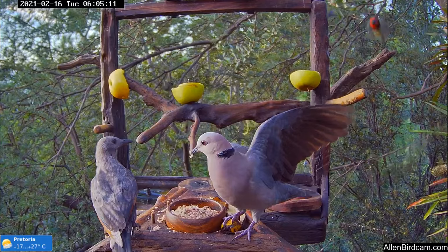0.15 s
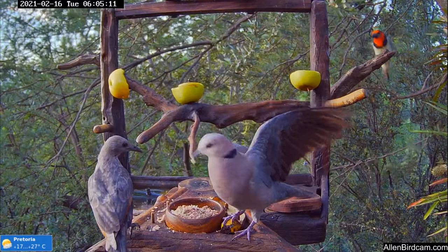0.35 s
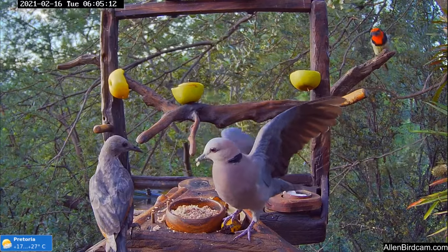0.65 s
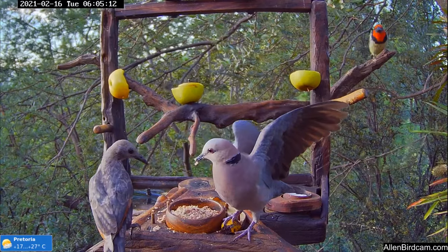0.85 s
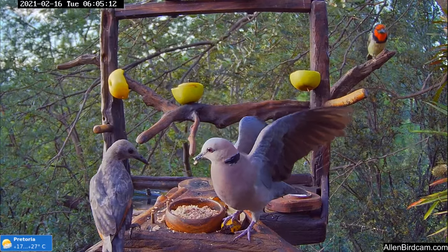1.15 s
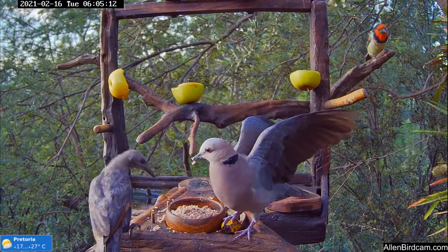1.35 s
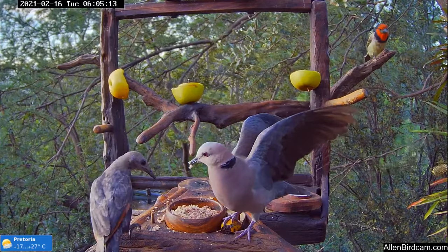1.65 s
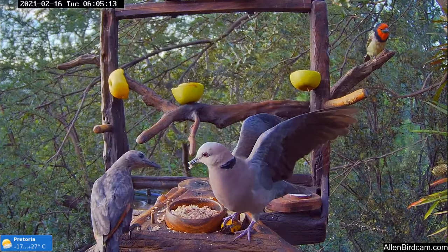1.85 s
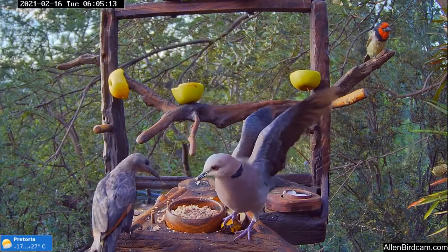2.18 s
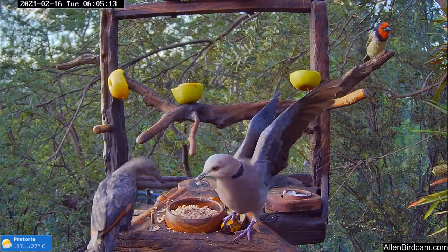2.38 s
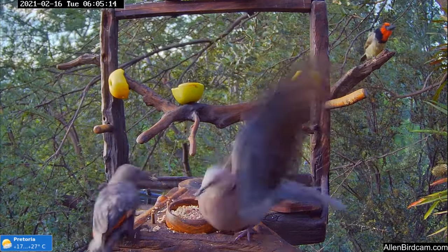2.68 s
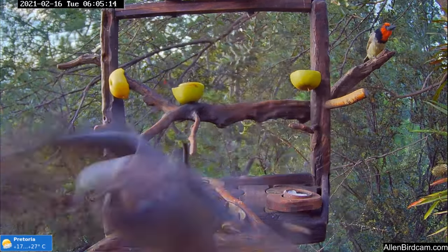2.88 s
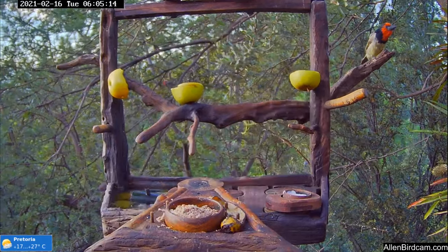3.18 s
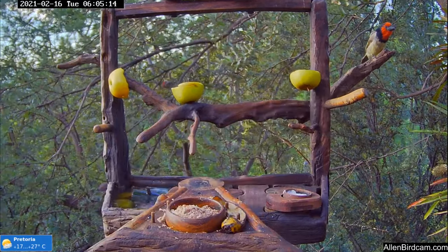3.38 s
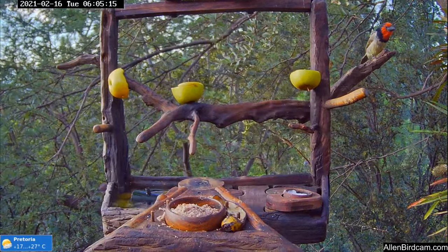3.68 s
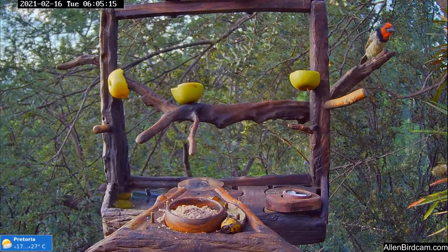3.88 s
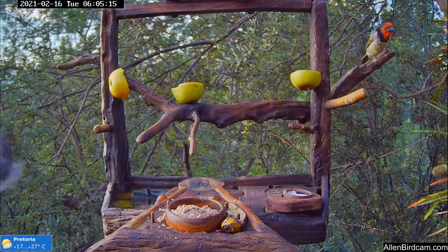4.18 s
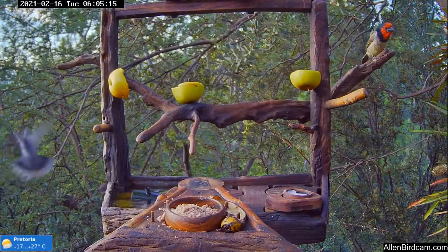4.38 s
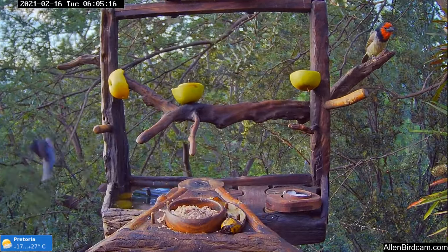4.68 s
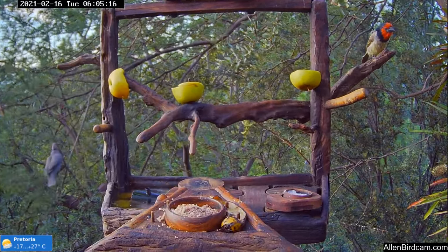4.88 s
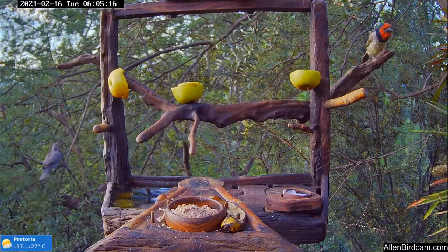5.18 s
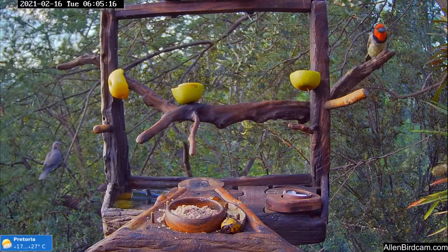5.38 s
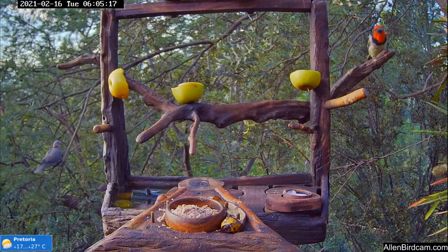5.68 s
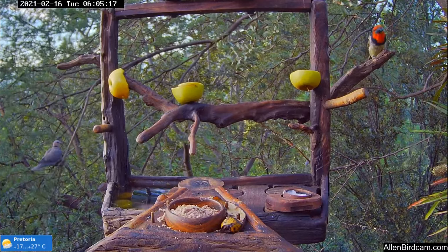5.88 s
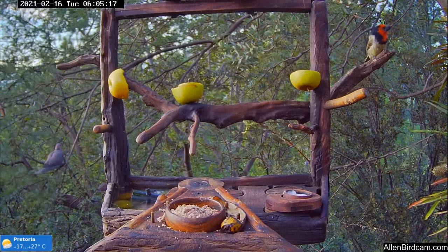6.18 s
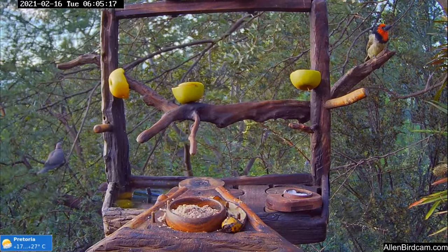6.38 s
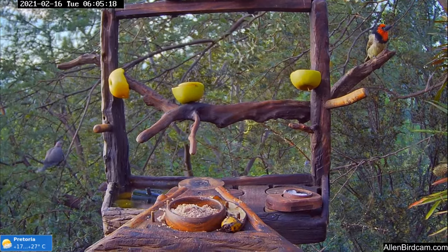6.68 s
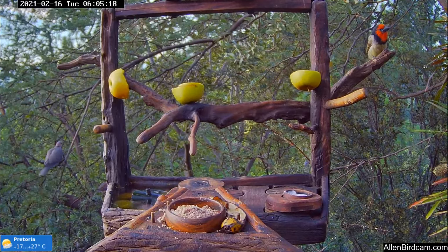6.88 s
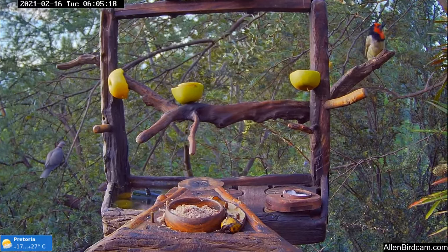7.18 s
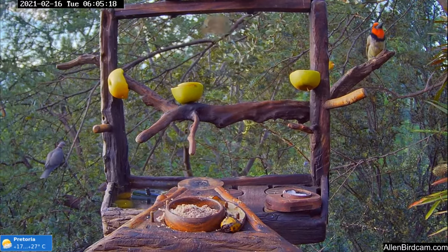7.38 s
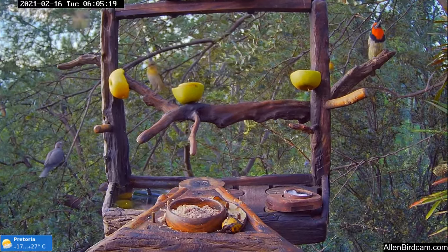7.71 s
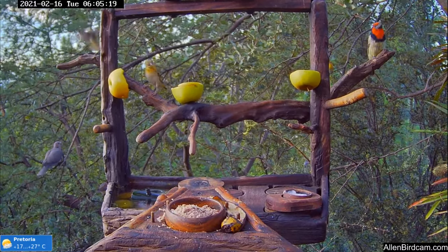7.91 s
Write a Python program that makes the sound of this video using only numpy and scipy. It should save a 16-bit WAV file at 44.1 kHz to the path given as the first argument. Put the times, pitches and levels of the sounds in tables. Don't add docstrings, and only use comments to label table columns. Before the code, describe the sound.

Early morning garden feeder, heard close up. Soft traffic drone and wind rumble come first, then one buzzy chirp and a sudden crack of dove wings, with airy strokes, breathy feather whistles and deep wind puffs fading quickly. Calm returns with faint distant hoots and a weaker chirp. Later, beak ticks and scraping claws on bark lead to a brief series of harsh clicking rasps over buffeting wind.

```python
import sys
import numpy as np
from scipy import signal
from scipy.fft import rfft, irfft, next_fast_len
from scipy.io import wavfile
from scipy.ndimage import uniform_filter1d, map_coordinates

SR = 44100
rng = np.random.default_rng(int(sys.argv[2]) if len(sys.argv) > 2 else 0)


def generate_wav(signal):
    frames = np.transpose(np.atleast_2d(signal))
    scaled = np.clip(frames, -1, 1) * 32767
    pcm = np.round(scaled).astype(np.int16)
    wavfile.write(sys.argv[1], SR, pcm)


def elevation(decibels):
    levels = np.asarray(decibels, float)
    return 10 ** (levels / 20)


N = 355005
TIME = np.arange(N) / SR

# time_s, peak_db, thud_db, treble_db and rustle_db (both against the peak)
CLAPS = [(2.1384, -41.5, -23, -3, -31), (2.1438, -10.5, -15.5, -4, -27.5), (2.1484, -13.5, -20.5, -3, -37),
         (2.1594, -20, -22, 0.5, -37.5), (2.1624, -36, -32.5, -10, -28.5), (2.2194, -19.5, -27.5, -17, -27),
         (2.1924, -49, -55, -6, -21), (2.2444, -60, -49, -27, -9), (2.355, -52, -50, -9, -5),
         (2.365, -40, -55, -1.5, -16), (2.4099, -41.5, -41, -30, -6), (2.4813, -43, -56, -33, -22),
         (2.5094, -48, -37, -19, -24), (2.5453, -62, -54, -24, -25.5), (2.597, -47, -37, -22, -10),
         (2.7194, -73, -54, -17, -9), (2.8434, -52, -49, -5, -5), (2.9407, -58, -54, -17, -16),
         (2.975, -64, -56, -4.5, -12), (3.537, -60, -52, -10, -14.5)]
# pitch_hz, level_db
FEATHERS = [(900, -31.5), (1600, -0.5), (2600, 1.5), (4200, 5.5), (6500, 5), (8000, -7), (11000, -21)]
# pitch_hz, level_db
QUILLS = [(5500, -32.5), (7200, 3), (10000, -6), (13000, -16.5), (15800, -14.5)]
# time_s, peak_db, pitch_hz
WHISTLES = [(2.398, -34, 860), (2.414, -36, 840), (2.632, -40, 800), (2.642, -43, 770), (2.422, -29.5, 827),
            (2.502, -32, 882), (2.65, -35, 655), (2.769, -35, 890), (2.894, -42.5, 795), (3.016, -43, 890),
            (3.148, -45.5, 860), (3.249, -47, 795), (3.456, -43.5, 906), (2.2657, -45, 1310),
            (2.2844, -54, 1120)]
# time_s, peak_db
DOWNWASH = [
    (2.262, -17),
    (2.394, -16),
    (2.509, -13),
    (2.613, -23),
]
# start_s, top_pitch_hz, whistle_db, buzz_db, stretch (length against the glide)
CHIRPS = [
    (1.829, 5535, -27.5, -26.5, 1.02),
    (4.845, 5437, -32.5, -30.5, .9),
]
# after_start_s, share_of_top_pitch
GLIDE = [(0, .94), (.006, 1.0), (.015, 0.94), (.025, .815), (.033, .76), (0.042, .67), (.046, .46),
         (.077, .395), (.084, .385)]
# after_start_s, level_db
LEVEL_WAVER = [
    [(.006, 1), (.018, 3), (.024, -7.5), (.0315, 6), (.036, -8), (.039, 0), (.044, -4), (.047, 3)],
    [(.009, -8), (.018, 2), (.0198, -6), (.026, 2), (.0305, -4), (.0345, -2), (.0365, 6), (.039, 2),
     (.043, 1)],
]
# whistle_db, buzz_db
OVERTONE_FALL_DB = [(16, 12), (23, 15)]
# pitch_hz, level_db
BEAK = [(1800, -33), (2400, -18.5), (3000, -13.5), (3700, -2.5), (4400, -1), (5600, -1.5), (6600, -7),
        (7800, -7), (10000, -10), (11600, -27.5), (13000, -23.5), (15300, -3.5)]
# delay_s, level_db
BRANCHES = [(.0021, -12.5), (.009, -14), (0.016, -14.5)]
# start_s, held_s, first_db, last_db, mouth_hz
RASPS = [
    (6.537, 0.017, -35.5, -35.5, 5180),
    (6.675, 0.21, -29.5, -28.5, 5670),
    (6.976, 0.021, -30, -37, 5530),
    (7.060, .013, -32, -34, 5240),
    (7.136, 0.024, -26, -35, 5340),
]
# pitch_hz, level_db, dies_by_60_db_s
THROAT = [(773, -21, 0.017), (1536, -18, 0.0067), (2080, -5, 0.002), (2810, -13.5, 0.0069),
          (4650, -11, 0.00366), (6920, -5, 0.0031)]
# upper_ring_hz, upper_db, top_ring_hz, top_db
TREBLE = [(9370, -11, 15000, -21.5), (9940, -5, 13300, -16.5), (9500, -6.5, 12500, -20),
          (9600, -6.5, 9800, -20), (10300, -3.5, 11500, -13)]
DEPTHS = [(.25, 0.93, 0.59), (0.17, .3, 0.84), (.35, .1, 0.3), (.3, 0.205, .3), (.15, 0.2, .6)]
# from_hz, to_hz
VALLEYS = [(3450, 4150), (7900, 8600)]
# pitch_hz, level_db
WIDE_RINGS = [(11300, -9), (14870, -18), (8400, -5.5)]
# time_s, level_db
STRAYS = [(6.534, -60.5), (6.572, -46), (6.578, -51), (6.584, -45), (6.592, -45), (6.599, -48),
          (6.928, -47), (7.057, -58), (7.12, -51), (7.126, -48.5), (7.176, -38), (7.184, -44), (7.191, -42)]
# start_s, peak_db, strongest_ring_hz, length_s, swell (0-1)
CLAWS = [(0.453, -55, 2000, .016, 0.4), (4.829, -52.5, 5280, .016, 0), (5.912, -46.5, 1800, 0.034, 0.93),
         (6.028, -43.5, 4330, 0.024, 0.99), (6.047, -41, 2970, 0.027, 0.91),
         (6.175, -37, 2030, 0.047, 0.94), (6.195, -31.5, 5700, 0.027, 0.9), (6.211, -31.5, 4500, .02, 0.86),
         (6.225, -38, 3000, 0.031, 0.93), (6.248, -32, 2660, 0.014, 0.95), (6.253, -35, 5030, 0.016, .8),
         (6.256, -37.5, 2660, .012, 1)]
SPOTS = [(1750, 2400, 2800, 2700), (3500, 4000, 7500, 6200), (2800, 7100, 10400, 5200),
         (6860, 4600, 5100, 4400), (2870, 2400, 3540, 3900), (2900, 2070, 1650, 4300),
         (5870, 4000, 7110, 12600), (4900, 6100, 2740, 10400), (2680, 4300, 1400, 6700),
         (2860, 2600, 5600, 2580), (5280, 3870, 6340, 5100), (2620, 7900, 8600, 5320)]
# pitch_hz, level_db
BARK = [(1500, -0.5), (7000, 0.5), (8500, -5), (11000, -8.5), (13500, -19)]
# time_s, peak_db, then three columns of ring_hz
TAPS = [(2.481, -37, 3100, 4460, 6300), (2.597, -35, 2680, 5430, 4700), (2.843, -52, 8900, 6950, 4670),
        (2.989, -49, 2660, 4750, 3400), (5.739, -44.5, 7200, 5670, 7700), (5.747, -45, 7200, 5600, 6100),
        (5.761, -40, 4920, 2750, 11000), (5.877, -29, 7130, 5300, 10040), (5.878, -41, 3740, 2700, 8900),
        (6.011, -42, 7620, 3600, 5110), (5.762, -43, 8700, 6500, 7600), (5.891, -35.5, 1760, 3860, 10500),
        (6.010, -38, 9000, 4470, 10500), (6.136, -40, 5900, 7000, 10500), (6.376, -58.5, 5000, 6000, 8100),
        (6.4867, -52, 5400, 9100, 4600), (6.492, -38, 4440, 5550, 4740)]
# time_s, peak_db, pitch_hz
KNOCKS = [(2.504, -28, 281), (6.729, -27.5, 487), (6.845, -30.5, 752), (7.0, -32.5, 705),
          (0.741, -43.5, 528), (2.932, -40.5, 557), (4.569, -41.5, 560), (4.828, -39, 620)]
# time_s, strength_db
WIND = [(0.0, -52), (0.25, -33.5), (0.55, -35.5), (0.75, -46.5), (1.3, -43), (1.85, -47), (2.12, -34.5),
        (2.3, -23.5), (2.9, -29), (3.35, -33.5), (4.3, -32), (4.65, -26.5), (5.1, -35), (5.8, -32),
        (6.45, -29.5), (6.95, -21), (7.5, -26), (8.05, -36.5)]
# pitch_hz, level_db
PUSH = [(3, -40), (6, 12), (19, 7.5), (30, -5), (45, -26.5), (80, -72.5)]
# pitch_hz, level_db
FLUTTER = [(22, -24.5), (36, 6.5), (70, -1.5), (110, -11.5), (170, -19), (300, -66)]
# time_s, push_rise_db, flutter_rise_db
GUSTS = [(0.02, -23, 14.5), (1.0, 10, 4), (1.5, 13.5, 9.5), (3.15, 5, -6), (3.599, 7, -0.5), (3.82, 7, -3),
         (4.05, 11, 3), (5.3, 5, -1), (5.55, -1, 3.5), (5.93, 7.5, 1.5), (6.6, -4.5, -6), (7.2, 1, 0),
         (7.33, 5, -5.5), (7.7, 6, -6.5)]
# time_s, roar_db
ROAD = [(0.0, -53), (0.33, -55.5), (0.55, -54), (1.05, -53.5), (1.3, -56.5), (2.1, -53.5), (2.35, -44.5),
        (2.65, -49), (3.0, -53.5), (3.9, -55), (4.3, -52), (5.5, -53), (6.1, -58.5), (6.7, -55.5),
        (7.05, -47), (7.35, -55), (8.05, -56.5)]
# pitch_hz, level_db
DRONE = [(110, -24.5), (150, 0.5), (195, 1), (228, 1.5), (262, 6), (305, 8), (370, -2.5), (450, -50)]
# pitch_hz, level_db
ROAR = [(210, 3), (350, -5), (425, -2.5), (502, -3), (555, 1), (714, -2.5), (896, -7), (1230, -14),
        (1480, -16.5), (2070, -28.5), (2600, -44.5), (3380, -61), (5720, -120)]
# time_s, rise_db
LORRIES = [(0.05, 12.5), (.47, 11.5), (0.92, 13.5), (1.68, 11.5), (2.55, 8), (2.98, 10), (4.12, 1.5),
           (6.76, 12), (7.42, 9.5), (7.95, 6)]
# time_s, level_db
ENGINE = [(0, -67), (1, -56.5), (1.5, -50), (2, -52), (3.1, -47.5), (3.5, -56.5), (8.05, -66)]
# time_s, rise_db
LOAD = [
    (1.72, 22),
]
# pitch_hz, level_db
HISS = [(1200, -26), (2000, -5), (3000, -2), (5000, -8), (8000, -14), (11000, -20.5), (15500, -20.5),
        (16200, -57.5)]
# start_s, length_s, first_hz, last_hz, level_db
FAR = [(4.103, 0.12, 232, 223, -45), (4.876, 0.057, 246, 224, -41), (5.212, 0.16, 250, 224, -49),
       (5.463, 0.14, 228, 242, -48), (2.838, 0.13, 220, 230, -47), (0.39, 0.024, 5640, 5600, -57),
       (.42, 0.1, 5600, 5600, -82), (0.625, 0.085, 1470, 1640, -56), (0.75, 0.12, 1480, 1590, -56),
       (.94, .04, 1480, 1440, -66), (.85, .06, 5750, 5900, -85), (1.815, .028, 2900, 2800, -68),
       (0.76, 0.11, 3060, 2890, -77), (2.905, 0.055, 3100, 3050, -75), (2.545, .05, 5000, 4950, -73),
       (3.97, .13, 2900, 2850, -82), (3.296, 0.13, 3500, 3730, -82), (5.27, 0.094, 3650, 3550, -79),
       (5.295, 0.068, 3060, 3100, -78), (7.431, 0.035, 4100, 4120, -79), (7.45, 0.05, 3480, 3600, -71),
       (7.472, .025, 3150, 3050, -72), (7.497, 0.12, 3120, 3130, -71), (7.5, .11, 3680, 3680, -75)]
# time_s, peak_db
CRACKLE = [(0.6365, -75), (1.2905, -73), (1.4491, -70), (1.4965, -73), (1.5359, -73), (1.6561, -73),
           (1.696, -71), (3.5367, -73.5), (4.1713, -69), (4.295, -72), (4.3349, -69), (4.3943, -78),
           (4.4142, -78), (4.4551, -69), (4.495, -72.5), (4.5155, -79), (4.5345, -77.5), (4.5744, -75),
           (4.6542, -71), (4.6946, -74), (4.7739, -74), (4.8148, -77), (5.0742, -76), (5.3939, -75),
           (5.4937, -73), (5.5536, -70), (5.7137, -74.5), (7.4521, -78), (7.4711, -75.5), (7.5938, -74.5),
           (7.6746, -74), (7.8617, -68), (7.914, -71), (7.954, -73)]
# pitch_hz, dies_by_60_db_s
GARDEN = [(200, 0.37), (2000, 0.31), (4300, 0.24), (6500, 0.25), (10000, 0.18), (13000, 0.15)]


def unit(x):
    return x / np.sqrt(np.mean(x ** 2) + 1e-20)


def along(points, hz):
    f, v = np.transpose(points)
    return np.interp(np.log(hz + 1), np.log(f + 1), v)


def curves(rows):
    s, *cols = np.transpose(rows)
    return [np.interp(TIME, s, c) for c in cols]


def during(rows):
    return (TIME > rows[0][0]) & (TIME < rows[-1][0])


def near(s, length):
    return slice(max(int(s * SR), 0), int((s + length) * SR) + 1)


def bumps(s, rise_db, half_s):
    steps = TIME[::100]
    bells = np.exp(-.5 * ((steps[:, None] - s) / half_s) ** 2)
    return np.interp(TIME, steps, bells @ rise_db)


def wobble(rate):
    steps = TIME[::8]
    knots = rng.standard_normal(int(N * rate / SR) + 4)
    return np.interp(TIME, steps, map_coordinates(knots, [steps * rate]))


def below(x, top_hz, edge_hz):
    m = next_fast_len(N)
    gain = .5 - .5 * np.tanh((np.fft.rfftfreq(m, 1 / SR) - top_hz) / edge_hz)
    return irfft(rfft(x, m) * gain, m)[..., :N]


def rush(spectrum, patchy_db):
    z = signal.stft(rng.standard_normal(N), nperseg=1024)[2]
    field = uniform_filter1d(rng.standard_normal(z.shape), size=4, axis=0)
    field = uniform_filter1d(field, size=8, axis=1)
    x = signal.istft(z * elevation(patchy_db * unit(field)), nperseg=1024)[1][:N]
    m = next_fast_len(N + 8192)
    closed = [(spectrum[0][0] / 2, -120), *spectrum, (spectrum[-1][0] * 2, -120)]
    colour = elevation(along(closed, np.fft.rfftfreq(m, 1 / SR)))
    return unit(irfft(rfft(x, m) * colour, m)[:N])


def rings(s, hz, size, t60, rise):
    s, hz, size, t60 = (np.ravel(v)[:, None] for v in np.broadcast_arrays(s, hz, size, t60))
    at = np.ceil(s * SR).astype(int) + np.arange(int(t60.max() * SR))
    t = at / SR - s
    wave = size * np.sin(2 * np.pi * hz * t) * elevation(-60 * t / t60) * (1 - np.exp(-t / rise))
    return np.bincount(at.ravel(), wave.ravel(), N + SR)[:N]


def wing_swish(slap, snap):
    from_s, lift_s = 2.12, .17
    stroke_s, stroke_at_s = .121, 2.385
    since = TIME - from_s - lift_s
    swish_db = -53.5 + np.where(since < 0, 35 * since, -33 * since)
    treble_db = -17 - 31.5 * np.abs(since)
    beat_db = 3.5 * np.cos(2 * np.pi * (TIME - stroke_at_s) / stroke_s)
    fade_in = np.clip((TIME - from_s) / 0.028, 0, 1) ** 2
    level = fade_in * elevation(beat_db + swish_db - 5.0 + 3 * wobble(70) + 3 * wobble(320))
    swish = level * (slap + elevation(treble_db) * snap)
    draw_s, draw_db, draw_db_per_s = 1.9, -46.5, 900.5
    draw = (TIME < draw_s) * elevation(draw_db + draw_db_per_s * np.minimum(TIME - draw_s, 0))
    return swish + draw * (slap + .6 * snap)


def wing_claps(slap, snap):
    out = np.zeros(N)
    thud = rush([(60, -30), (150, 2), (450, -5), (1000, -3), (1500, -8), (3000, -40)], patchy_db=.5)
    rustle = elevation(3.5 * wobble(220)) * (rush(FEATHERS, patchy_db=5) + .2 * snap)
    for s, db, thud_db, bright_db, rustle_db in CLAPS:
        part = near(s, .25)
        t = np.maximum(TIME[part] - s, 0)
        burst = elevation(-5 - 60 * t / .013) * (1 - np.exp(-t / .0004))
        out[part] += elevation(db) * burst * (slap[part] + elevation(bright_db) * snap[part])
        out[part] += elevation(db + rustle_db - 60 * t / 0.072) * (1 - np.exp(-t / 0.0019)) * rustle[part]
        out[part] += elevation(thud_db + 1.5 - 60 * t / .022) * (1 - np.exp(-t / .0008)) * thud[part]
    s, db, _, bright_db, _ = np.transpose(CLAPS)[..., None]
    crack_db = db + [-11, -3, 3] + bright_db * [0, 0, 1]
    return out + rings(s + .001, [1050, 3900, 6900], elevation(crack_db), .004, rise=.00006)


def wing_whistles():
    out = np.zeros(N)
    for s, db, hz in WHISTLES:
        part = near(s - .04, .08)
        t = TIME[part] - s - .004
        width = np.where(t < 0, .005, .003)
        out[part] += elevation(db) * np.exp(-.5 * (t / width) ** 2) * np.sin(2 * np.pi * hz * t)
    return out


def doves():
    slap, snap = rush(FEATHERS, patchy_db=2.5), rush(QUILLS, patchy_db=2.5)
    return wing_swish(slap, snap) + wing_claps(slap, snap) + wing_whistles()


def finch():
    out = np.zeros(N)
    plain, share = np.transpose(GLIDE)
    edge_db = -23.5
    sweeps_per_s, sweep_top, sweep_drop = 92, 1.06, .62
    second_voice_s, second_voice_db = .0048, -5.5
    for chirp, level_waver, (pure_db, harsh_db) in zip(CHIRPS, LEVEL_WAVER, OVERTONE_FALL_DB):
        s, top_hz, whistle_db, buzz_db, stretch = chirp
        after = np.append(stretch * plain[:-2], plain[-2:])
        break_s = after[-3]
        part = near(s, after[-1])
        t = TIME[part] - s
        levels = [whistle_db + edge_db, whistle_db, buzz_db, buzz_db - 4.5, buzz_db + edge_db]
        db = np.interp(t, after[[0, 1, -3, -2, -1]], levels)
        db = db + np.interp(t, *np.transpose(level_waver))
        buzz = 0.96 * np.clip((t - break_s) / 0.0022 + 1, 0, 1)
        stroke = (sweeps_per_s * np.maximum(t - break_s + .0031, 0) + .07 * wobble(110)[part] + .02) % 1
        sweep = (sweep_top - sweep_drop * stroke) * (1 + .1 * wobble(900)[part])
        pitch_hz = top_hz * np.where(buzz > .2, sweep, np.interp(t, after, share))
        turn = 2 * np.pi * np.cumsum(pitch_hz) / SR
        fall_db = pure_db + (harsh_db - pure_db) * buzz + 4.5 * wobble(220)[part]
        tone = 0
        for k in range(1, 7):
            size = elevation(along(BEAK, k * pitch_hz) - fall_db * (k - 1)) * (k * pitch_hz < SR / 2)
            tone = tone + size * np.sin(k * turn)
        soft = np.clip(t / 0.0046, 0, 1)
        gate = 1 - (t > break_s - .004) * np.cos(np.pi * stroke) ** 16
        voice = soft * elevation(db + 3 + (.8 + 2.2 * buzz) * wobble(300)[part]) * tone * gate
        out[part] += voice + elevation(second_voice_db) * np.roll(buzz * voice, round(second_voice_s * SR))
    out = out - 0.99 * (below(out, 13000, edge_hz=250) - below(out, 11700, edge_hz=290))
    return out + sum(elevation(db) * np.roll(out, round(delay * SR)) for delay, db in BRANCHES)


def rasp(s, held, first_db, last_db, mouth_hz):
    rise_s, fall_s, pulses_per_s = .010, .019, 420
    late_share, late_open = .7, .39
    first = np.array([first_db, pulses_per_s, mouth_hz])
    change = np.array([last_db - first_db, -130 * held, 4200 * held])
    end = s + rise_s + held
    return [(s, first_db - 15, pulses_per_s, mouth_hz),
            (s + rise_s, *first),
            (s + rise_s + late_share * held, *(first + change * [late_share, late_share, late_open])),
            (end, *(first + change)),
            (end + fall_s, *(first + change + [-12.5, -120, -110]))]


def barbet():
    out, wide = np.zeros(N), np.zeros(N)
    flutter, uneven = wobble(70), wobble(45)
    stray_s, stray_db = np.transpose(STRAYS)[..., None]
    throat_hz, throat_db, throat_t60 = np.transpose([(5300, 3, .004), *THROAT, (10500, -14, .003)])
    stray_size = elevation(stray_db + 7.5 + throat_db) * (-1) ** np.arange(len(throat_hz))
    out += rings(stray_s, throat_hz, stray_size, throat_t60, rise=.00002)
    depth = np.full((3, N), .3)
    for row, (upper_hz, upper_db, top_hz, top_db), shares in zip(RASPS, TREBLE, DEPTHS):
        rows = rasp(*row)
        start, lasts = rows[0][0], rows[-1][0] - rows[0][0]
        depth[:, near(start - .005, 1)] = np.clip(shares, 0, 1)[:, None]
        wide += during(rows) * np.clip((TIME - start - .055) / .035, 0, 1)
        db, rate, mouth_hz = curves(rows)
        throb = np.cos(2 * np.pi * 11.5 * (TIME - start - .042))
        db = db + 2.6 * lasts / .25 * throb + .6 * flutter
        rate = rate * (1 + .07 * uneven)
        at = np.flatnonzero(np.diff(np.floor(np.cumsum(rate * during(rows)) / SR)))
        chance = rng.standard_normal((len(at), 6))
        first = at / SR + .0001 * chance[:, 0]
        s = np.array([first, first + 0.001051 + 0.00022 * chance[:, 1]])
        twin_db = np.array([1.0 * chance[:, 2], -7 + 2.2 * chance[:, 3]])
        size = np.sign(rng.standard_normal(len(at)) - 1.1) * elevation(db[at] + 9.0 + twin_db)
        out += rings(s, mouth_hz[at] * (1 + .07 * chance[:, 4:].T), size, .0048, rise=.00002)
        opened = [(hz, ring_db + 30 * (wide[at] - 1), .0025) for hz, ring_db in WIDE_RINGS]
        bright = [(upper_hz, upper_db, .003), (top_hz, top_db, .003)]
        for hz, ring_db, t60 in [*THROAT, *bright, *opened]:
            tissue_hz = hz * (1 + .035 * rng.standard_normal(s.shape))
            ring_size = size * elevation(ring_db) * rng.choice([-1, 1], s.shape)
            out += rings(s, tissue_hz, ring_size, t60, rise=.00002)
    out = out - below(out, 460, edge_hz=140)
    for (from_hz, to_hz), share in zip(VALLEYS, depth):
        band = below(out, to_hz, edge_hz=210) - below(out, from_hz, edge_hz=250)
        out = out - share * (1.2 + 0.21 * np.tanh(2 * wobble(30))) * band
    narrow = depth[2] * below(out, 14300, edge_hz=740) + (1 - depth[2]) * below(out, 11400, edge_hz=500)
    wide = uniform_filter1d(wide, size=1200)
    return wide * out + (1 - wide) * narrow


def claws():
    s, db, ring_hz, length, swell = np.transpose(CLAWS)[..., None]
    chance = rng.random((len(CLAWS), 5, 240))
    sudden, swelling = chance[:, 0] ** 2.6, (chance[:, 0] + chance[:, 4]) / 2
    when = s + length * ((1 - swell) * sudden + swell * swelling)
    spread_hz = 1600 * 8.3 ** ((np.arange(5) + rng.random((len(CLAWS), 5))) / 5)
    pitches_hz = np.hstack([ring_hz, ring_hz, ring_hz, SPOTS, SPOTS, spread_hz])
    pick = (chance[:, 3] * pitches_hz.shape[1]).astype(int)
    loose = np.where(pick > 10, .2, .03)
    hz = np.take_along_axis(pitches_hz, pick, axis=1) * (1 + loose * (chance[:, 2] - .5))
    fade_db = 6.3 * (0.5 - swell) * chance[:, 0]
    size = elevation(db - 14.5 - 17.6 * chance[:, 1] - fade_db + along(BARK, hz))
    early = chance[:, 4] > .88
    when = when - early * .008 * chance[:, 1]
    return rings(when, hz, size * elevation(-18 * early), .011, rise=.0003)


def taps():
    tap_s = .0086
    s, db, *rings_hz = np.transpose(TAPS)
    chance = rng.random((len(TAPS), 3, 3, 8))
    late = chance[:, 0] ** 3.5
    hz = np.transpose(rings_hz)[..., None] * (.95 + .1 * chance[:, 1])
    ring_db = np.array([0, -2, -5])[:, None]
    size = elevation(db[:, None, None] - 10 - 6.5 * late - 4.2 * chance[:, 2] + ring_db)
    crack_hz = 2000 * 7.5 ** rng.random((len(TAPS), 24))
    crack_at = s[:, None] + tap_s * rng.random(crack_hz.shape) ** 2
    crack_size = elevation(db[:, None] - 7.5 - 6 + along(BARK, crack_hz))
    crack = rings(crack_at, crack_hz, crack_size, 0.0032, rise=.0001)
    return rings(s[:, None, None] + tap_s * late, hz, size, .017, rise=0.0002) + crack


def perch():
    s, db, hz = np.transpose(KNOCKS)[..., None]
    return rings(s, hz * [1, 1.6], elevation(db + [0, -5]), 0.056, rise=.0015)


def wind():
    gust_s, puff_s, flutter_under_db = .054, .013, -8
    strength_db, = curves(WIND)
    s, push_db, flutter_db = np.transpose(GUSTS)
    slow = unit(elevation(0.75 * wobble(10.0)) * rush(PUSH, patchy_db=0.0))
    push = elevation(strength_db + bumps(s, push_db, gust_s)) * slow
    for at, db in DOWNWASH:
        part = near(at - .15, .3)
        u = (TIME[part] - at) / puff_s
        push[part] += elevation(db) * (1 - u ** 2 / 2) * np.exp(-u ** 2 / 4)
    lumps = unit(elevation(1.8 * wobble(21)) * rush(FLUTTER, patchy_db=1.2))
    return push + elevation(strength_db + flutter_under_db + bumps(s, flutter_db, gust_s)) * lumps


def traffic():
    firing_hz, octave_db = 112.8, -15
    roar_db, = curves(ROAD)
    drone_db = roar_db - 3 + bumps(*np.transpose(LORRIES), half_s=.14)
    first_db, = curves(ENGINE)
    second_db = first_db + octave_db + bumps(*np.transpose(LOAD), half_s=.21)
    turn = 2 * np.pi * np.cumsum(firing_hz + 2.5 * wobble(9)) / SR
    engine = elevation(first_db + 1.5 * wobble(12)) * np.sin(turn)
    engine += elevation(second_db + 1.2 * wobble(13)) * np.sin(2 * turn)
    road = elevation(drone_db + 1.0) * rush(DRONE, patchy_db=4.5) + elevation(roar_db + 2.5) * rush(ROAR, patchy_db=3.5)
    return road + engine + elevation(-77.5) * rush(HISS, patchy_db=1.8)


def far_birds():
    out, flicker = np.zeros(N), elevation(4 * wobble(60))
    waver, husk_hz = 1 + .011 * wobble(160), 9 * wobble(40)
    for s, length, first_hz, last_hz, db in FAR:
        part = near(s, length)
        u = np.clip((TIME[part] - s) / length, 0, 1)
        pitch_hz = (first_hz + (last_hz - first_hz) * u) * waver[part] + husk_hz[part]
        out[part] += elevation(db) * np.sin(np.pi * u ** 0.46) * np.sin(2 * np.pi * np.cumsum(pitch_hz) / SR)
    return out * flicker


def crackle():
    s, db = np.transpose(CRACKLE)[..., None]
    click_hz = 4000 * 3.8 ** rng.random((len(CRACKLE), 8))
    return rings(s, click_hz, elevation(db + 0.5), .002, rise=.00005)


def garden(x):
    hz, t, z = signal.stft(rng.standard_normal(SR // 2), SR, nperseg=256)
    fading = z * elevation(-60 * t / along(GARDEN, hz)[:, None])
    tail = signal.istft(fading, SR, nperseg=256)[1]
    return signal.fftconvolve(np.pad(x, (200, 0)), tail / np.linalg.norm(tail))[:N]


def scene():
    bark = claws() + taps() + perch()
    sources = [(doves(), -15), (finch(), -12), (barbet(), -19), (bark, -13), (far_birds(), -6)]
    birds = sum(x + elevation(echo_db) * garden(x) for x, echo_db in sources)
    return (birds + wind() + traffic() + crackle())[None]


def top_cut(x):
    return signal.sosfilt(signal.butter(12, 16460, fs=SR, output="sos"), x)


def record(dry):
    mix = below(dry, 15900, edge_hz=120.6)
    return top_cut(mix)


dry = scene()
out = record(dry)
generate_wav(out)
```